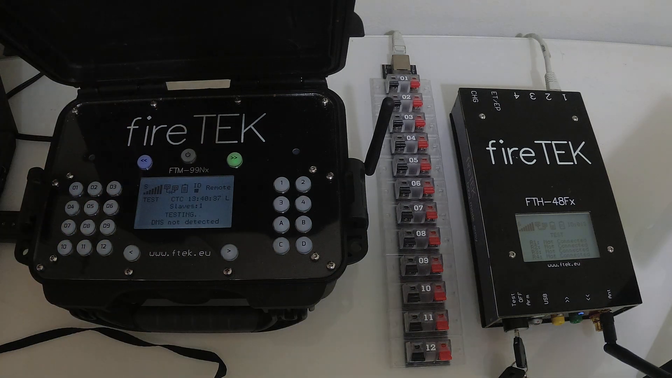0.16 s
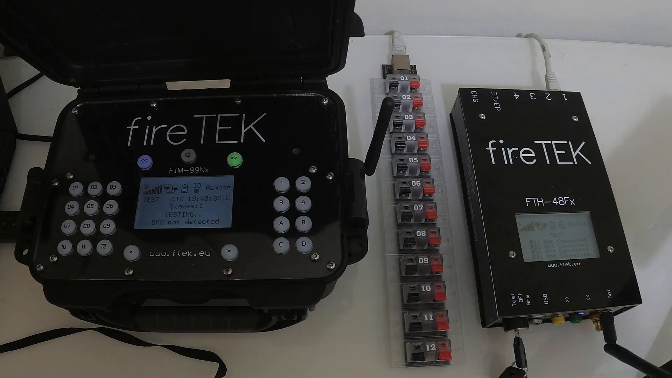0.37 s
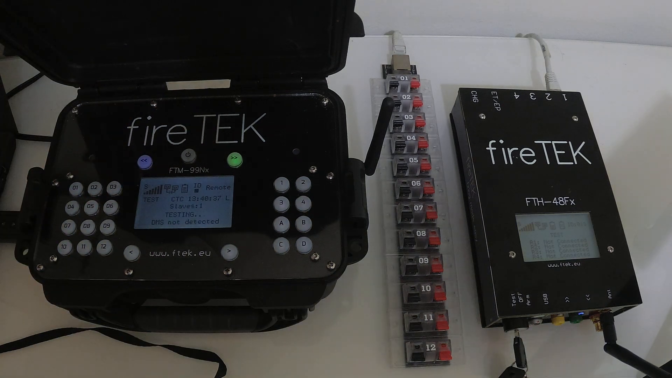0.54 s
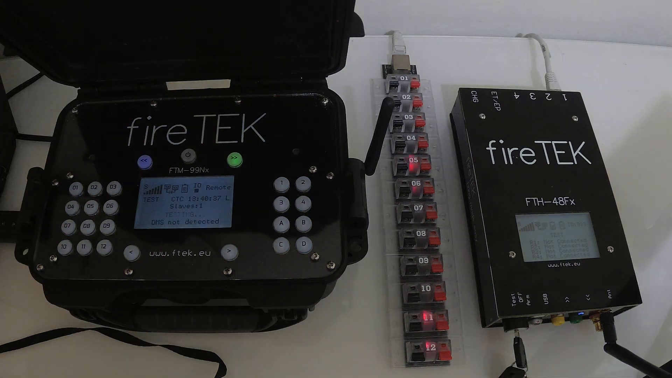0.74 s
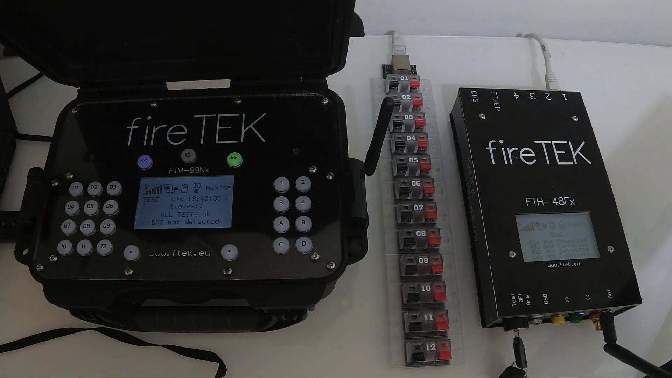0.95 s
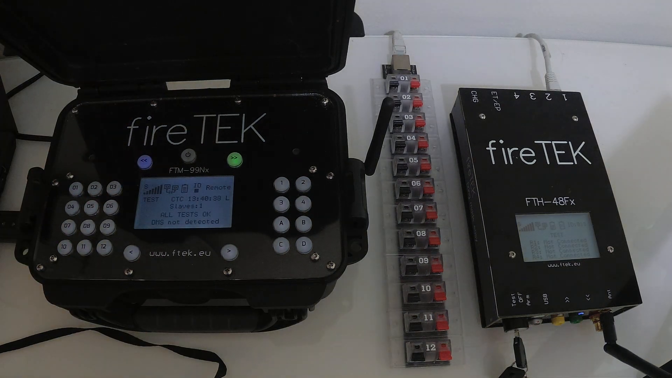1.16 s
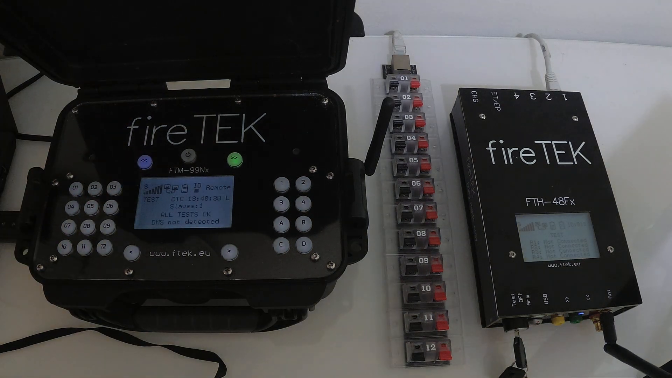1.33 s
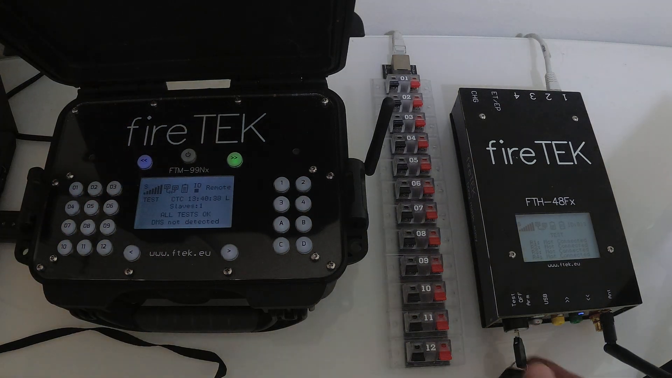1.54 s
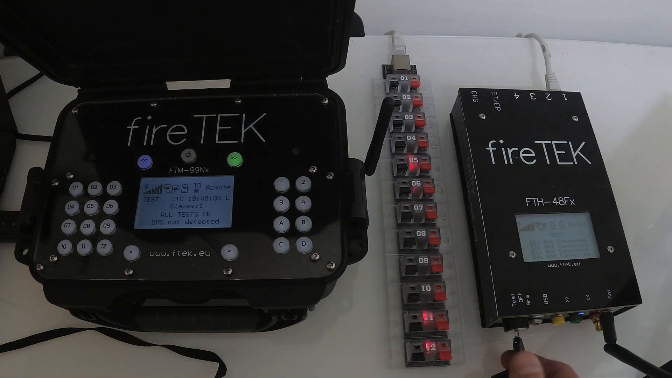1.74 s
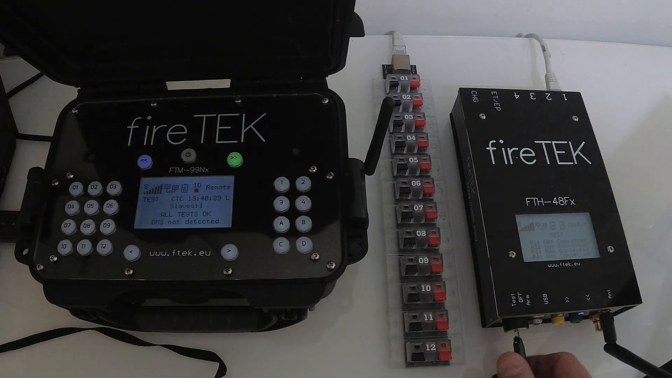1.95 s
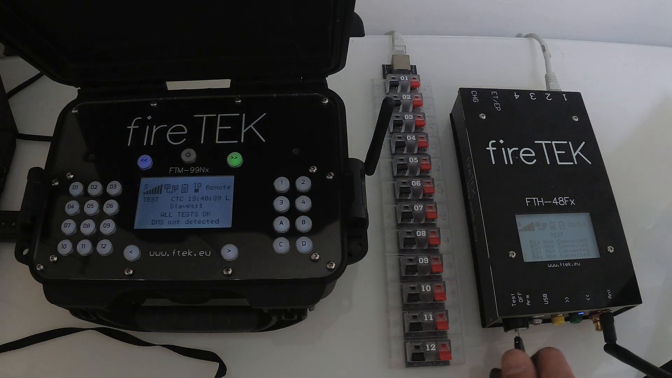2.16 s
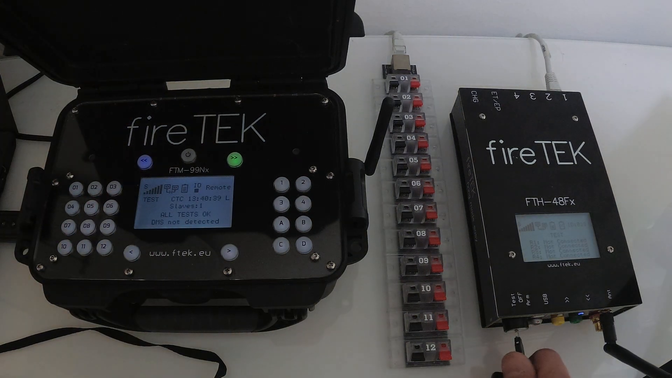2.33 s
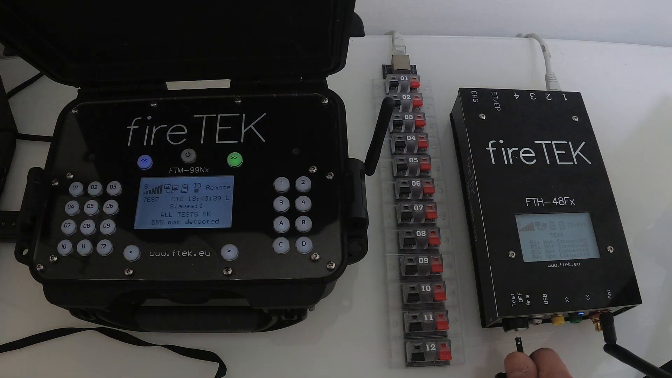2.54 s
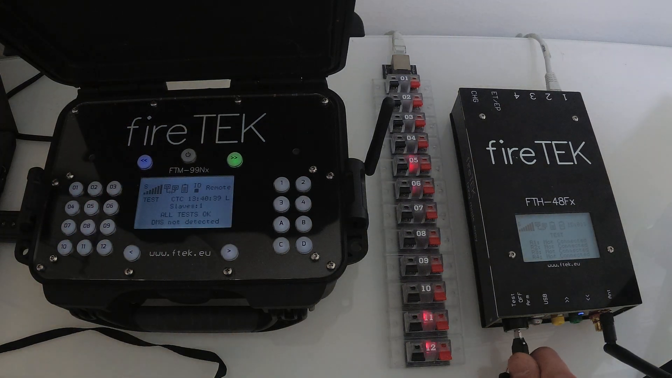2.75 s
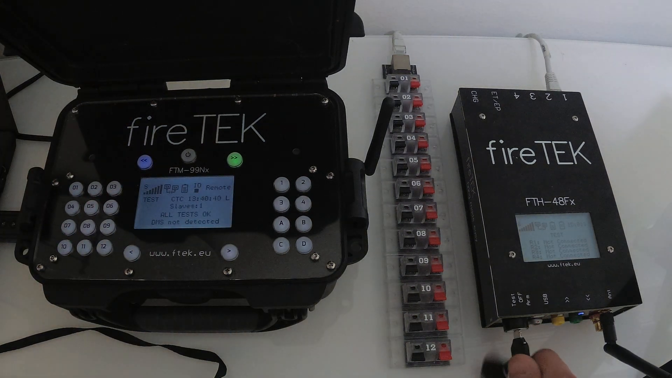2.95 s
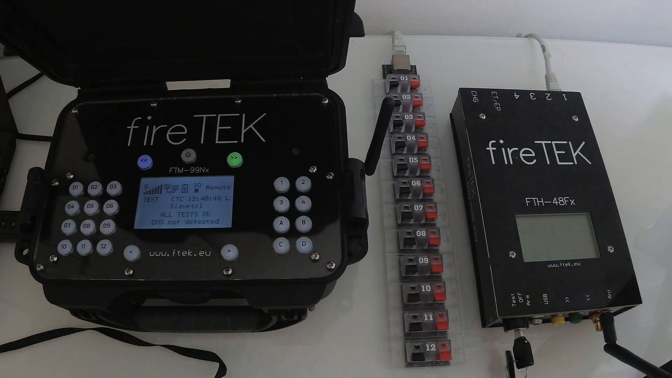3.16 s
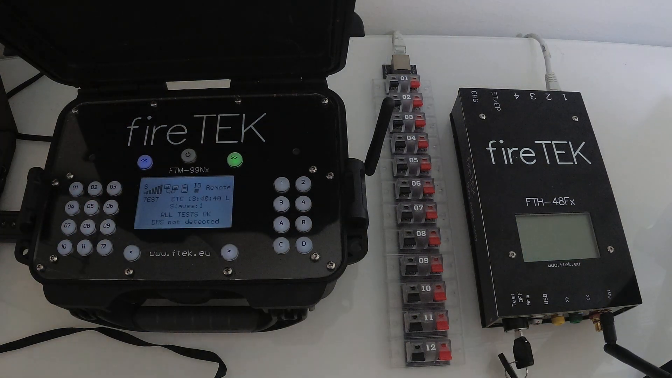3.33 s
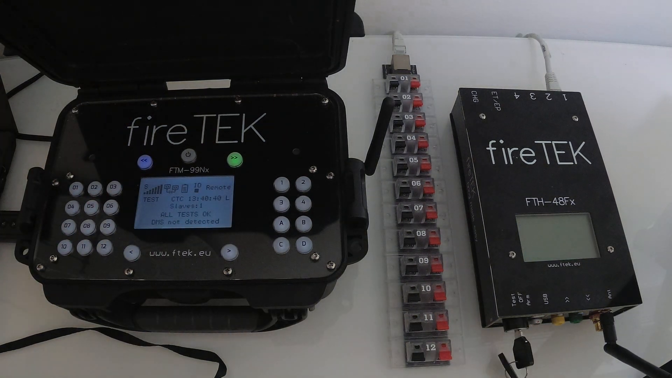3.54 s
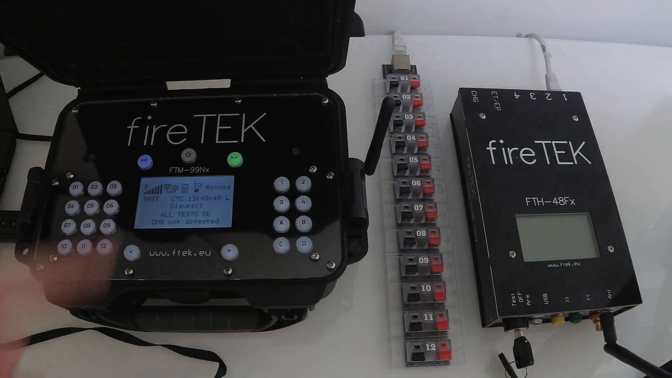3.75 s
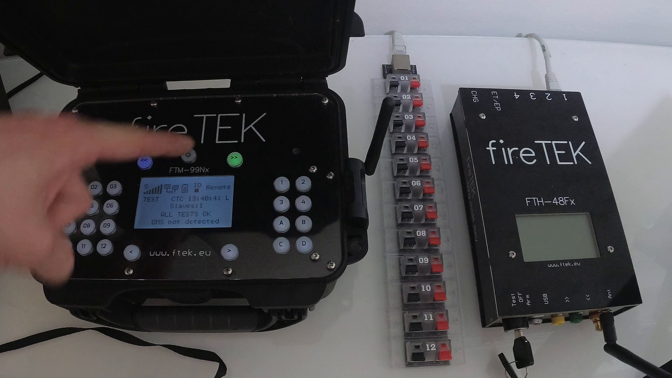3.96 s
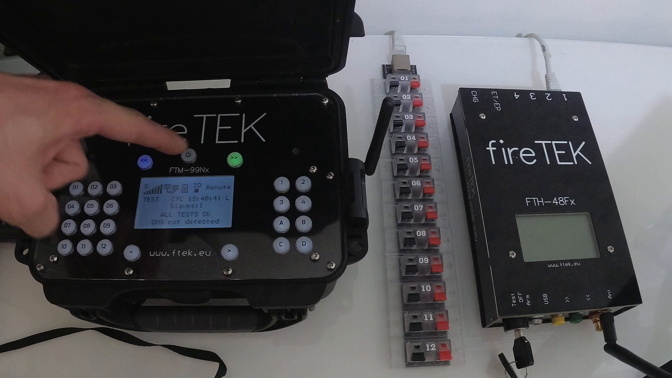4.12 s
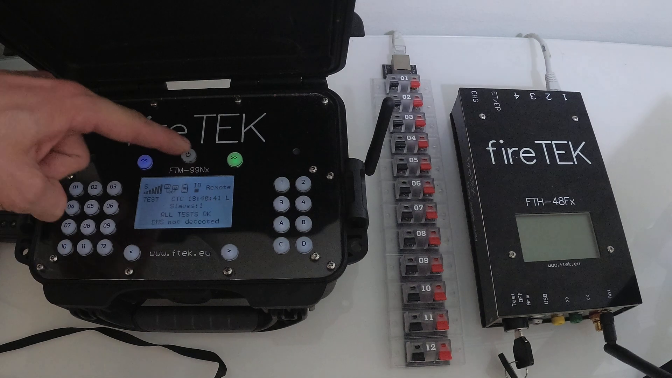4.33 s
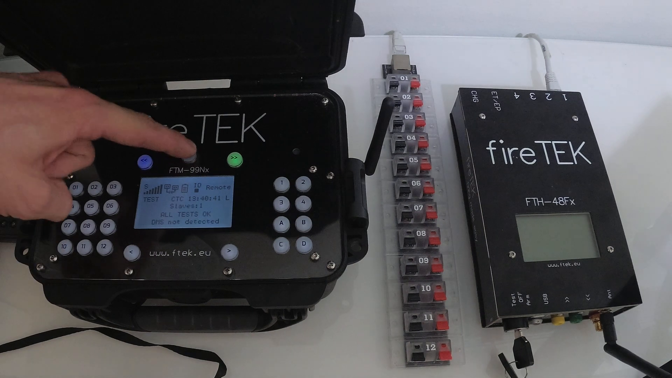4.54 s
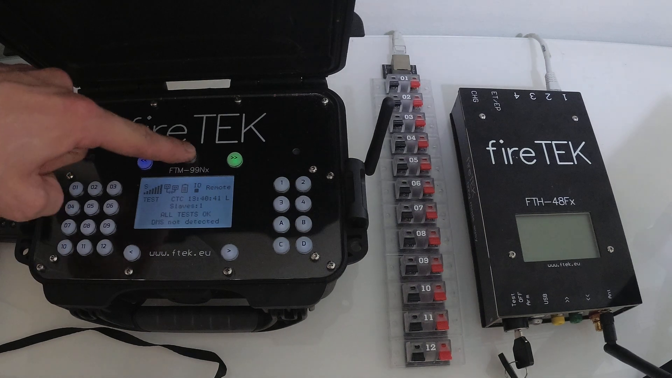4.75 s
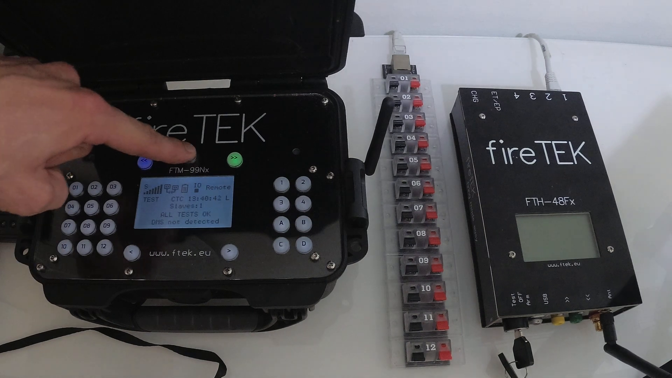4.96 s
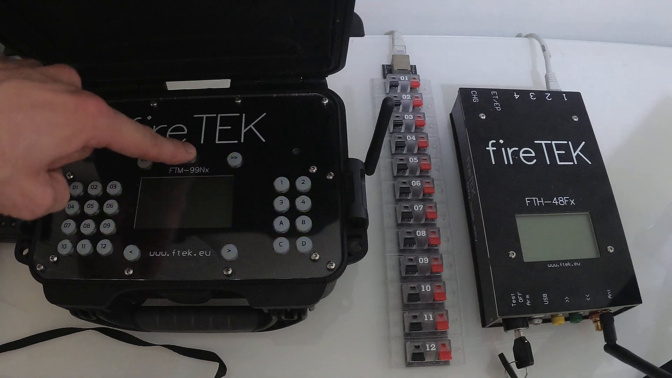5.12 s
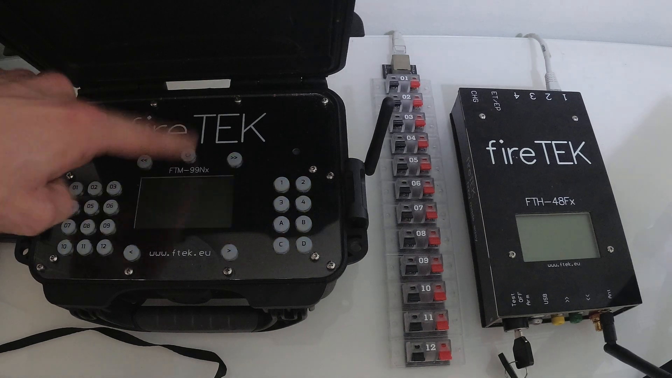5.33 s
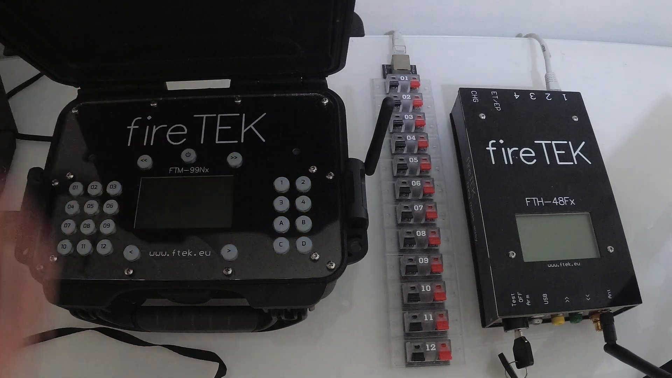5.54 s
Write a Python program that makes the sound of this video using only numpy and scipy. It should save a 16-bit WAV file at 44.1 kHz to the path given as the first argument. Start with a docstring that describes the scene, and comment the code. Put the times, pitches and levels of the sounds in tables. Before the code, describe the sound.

A quiet, small bare room heard close in stereo, with soft low-mid room noise, fine hiss, a weak low motor hum and a barely audible very high whine. From 0.4 to 1.2 s faint dry creaks sit near the left ear amid dull cloth rustle. At about 1.6 s a key is touched in a metal box, slightly right: a small crisp click with soft table thuds. Very faint fumbling ticks follow from 2.0 to 2.4 s. At 2.63 s comes a hard clack, then at 2.88 s the loudest, a brilliant metallic snap, with a smaller one at 2.95 s and light ticks to 3.4 s; rustle swells around 3 s. Tiny creaks and a dull knock occur at left between 3.3 and 3.9 s, then near stillness. At 5.16 s a plastic button snaps with a hollow, short boom, trailed by small knocks until 5.45 s. The room adds brief tails.

```python
"""Key turned in a switch, button let go

A small key is handled and turned in the switch of a metal-faced box on the right, then a button on a plastic
case to the left is let go: brief pushes ring banks of modes, with hard cracks on top and table thuds below.
Random slips creak near the left ear, shaped noise makes cloth and hiss, sines make the motor and steady tones.
A small, bare room answers the key, table and button with a decaying noise tail.
"""
import sys
import numpy as np
from scipy import signal
from scipy.fft import rfft, irfft
from scipy.io import wavfile

SR = 44100
rng = np.random.default_rng(int(sys.argv[2]) if len(sys.argv) > 2 else 0)


def put_to_file(sound):
    """Save the sound as 16-bit audio at rate SR, in the file named by the first command-line argument."""
    columns = np.atleast_2d(sound).T  # one column per channel
    safe = np.clip(columns, -1, 1)
    whole_steps = np.round(safe * 32767)
    wavfile.write(sys.argv[1], SR, whole_steps.astype(np.int16))


N = 250825


def amp(db):
    """Turn decibels into gain."""
    return 10 ** (np.asarray(db) / 20)


def pan(db):
    """Gains for the two ears that put left above right by this many dB."""
    return amp([[db / 2], [-db / 2]])


def rms_one(x):
    """Scale to rms 1."""
    return x / np.sqrt(np.mean(x ** 2) + 1e-20)


def in_time(rows):
    """Draw a (time, value) curve with one value a sample."""
    return np.interp(np.arange(N) / SR, *np.transpose(rows))


def at_hz(points, hz):
    """Read a (frequency, value) curve on a log-frequency axis."""
    point_hz, value = np.array(points).T
    return np.interp(np.log(np.maximum(hz, 1)), np.log(point_hz), value)


def drift(rate_hz):
    """Slow random wander of spread 1: noise at a fortieth of the sample rate through two equal poles."""
    r = np.exp(-80 * np.pi * rate_hz / SR)
    noise = rng.standard_normal(N // 40 + 2002)
    slow = signal.lfilter([1], [1, -2 * r, r * r], noise)[2000:]   # skip the filter's start
    return np.interp(np.arange(N) / 40, np.arange(len(slow)), rms_one(slow))


def stereo_noise(spectrum):
    """Coloured noise of rms 1, partly alike in both ears in the bass and nearly unrelated in the treble."""
    # how alike the ears are: (frequency [Hz], left-right correlation [-1 to 1])
    likeness = [(60, 0.63), (180, 0.45), (550, 0.61), (1650, 0.16), (4970, -0.1), (15000, 0.02)]
    hz = np.arange(N // 2 + 1) * SR / N
    alike = np.clip(at_hz(likeness, hz), -1, 1)
    mid, side = rfft(rng.standard_normal((2, N)))
    ears = np.sqrt(1 + alike) * mid + np.sqrt(1 - alike) * side * [[1], [-1]]
    return rms_one(irfft(ears * amp(at_hz(spectrum, hz)), N))


def contact(ms, lag_s, apart):
    """A brief scraping push of noise; each ear hears a partly different side of the object."""
    t = np.arange(round(.3 * SR)) / SR
    width_s = max(ms, .3) / 1000
    envelope = t / (t + width_s / 8) * np.exp(-(t / width_s) ** 2)
    shared, left, right = rng.standard_normal((3, len(t))) * envelope
    ears = np.array([shared + apart * left, shared + apart * right])
    far = int(lag_s < 0)   # a positive lag delays the left ear, a negative one the right
    ears[far] = np.roll(ears[far], round(abs(lag_s) * SR))
    return ears + 1e-18


def soft(push, top_hz):
    """A yielding surface passes on only the slow part of a push."""
    return signal.sosfilt(signal.butter(2, top_hz, fs=SR, output="sos"), push)


def ring(push, modes, favoured_hz=None, narrow_db=2.5, scatter_db=1.5):
    """A push rings every mode at its own height, most near the pitch that the point of contact favours."""
    out = 0
    head = push[:, :1024]
    floor = .25 * np.sqrt(np.sum(head ** 2))   # a pitch missing from the push stays faint
    for k, (hz, level_db, t60) in enumerate(modes):
        r = amp(-60 / (t60 * SR))
        w = 2 * np.pi * hz / SR
        # what the push holds at this pitch
        share = np.abs(head @ np.exp(-1j * w * np.arange(1024)))[:, None] + floor
        off_db = -narrow_db * np.log2(hz / favoured_hz) ** 2 if favoured_hz else 0
        height = amp(level_db + off_db + scatter_db * rng.standard_normal())
        gain = height / share * (-1) ** k   # neighbours swing opposite ways
        out = out + gain * signal.lfilter([.5, 0, -.5], [1, -2 * r * np.cos(w), r * r], push)
    return out


def crack(push):
    """The bare snap of hard surfaces meeting: the push with its spectrum evened out, then coloured."""
    # colour of the snap: (frequency [Hz], density [dB per Hz])
    snap_colour = [(500, -25), (1200, 0.5), (3000, 9), (6000, 5.5), (10000, 9.5), (12000, 0), (15000, -6)]
    length = push.shape[1]
    colour = amp(at_hz(snap_colour, np.arange(length // 2 + 1) * SR / length))
    spectrum = rfft(push)
    even = spectrum / (np.abs(spectrum) + 1e-9) ** .6
    snap = irfft(even * colour, length) * (np.abs(push) > 1e-9)   # silent once the push is over
    strength = np.sqrt(np.sum(snap ** 4, axis=1) / np.sum(snap ** 2, axis=1))   # weighted to the loud part
    return snap / strength[:, None] / 2


def add(track, s, sound):
    """Mix a sound into the track at a time in seconds."""
    i = round(s * SR)
    track[:, i:i + sound.shape[1]] += sound[:, :N - i]


def room_tone():
    """Room tone and recorder hiss: steady noise, strongest in the low mids."""
    # colour of the noise: (frequency [Hz], density [dB per Hz])
    tone_colour = [(20, -26), (45, -19), (90, -13), (130, -3), (220, 3), (400, -4.5), (650, -8.5),
                   (1000, -10.5), (2000, -15), (4000, -15), (9000, -15.5), (15000, -16)]
    return amp(-59.5) * stereo_noise(tone_colour)


def room(x):
    """Each ear gets a dense tail of reflections that dies band by band."""
    # decay of the room: (frequency [Hz], time to fall 60 dB [s])
    decay = [(200, 0.28), (530, 0.34), (1400, 0.39), (3700, 0.31), (9700, 0.3), (15000, 0.18)]
    level_db, gap_s = -7, 0.0013
    t = np.arange(round(.7 * SR)) / SR
    edges = 100 * 2 ** np.arange(0, 7.6, .5)   # half-octave bands [Hz]
    tail = 0
    for low, high in zip(edges, edges[1:]):
        band_pass = signal.butter(2, [low, high], "band", fs=SR, output="sos")
        band = signal.sosfilt(band_pass, rng.standard_normal((2, len(t))))
        tail = tail + band * amp(-60 * t / at_hz(decay, np.sqrt(low * high)))
    tail[1] = .5 * tail[0] + np.sqrt(.75) * tail[1]   # the two ears sit close together
    tail = tail * np.clip(t / gap_s - 1, 0, 1)   # the first wall is a little way off
    tail = tail / np.sqrt(np.sum(tail ** 2) / 2)
    return amp(level_db) * signal.fftconvolve(x, tail, axes=1)[:, :N]


def steady_tones():
    """Two sines that stand still, one low and one very high."""
    # steady tones: (frequency [Hz], level [dB rms])
    tones = [(70, -85.5), (15703.5, -75.5)]
    t = np.arange(N) / SR
    return np.sqrt(2) * sum(amp(db) * np.sin(2 * np.pi * hz * t) for hz, db in tones)


def motor():
    """Motor orders are sines that share one slightly wandering speed; the upper ones waver a little in level."""
    # upper orders: (multiple of the motor speed, level before wavering [dB rms])
    orders = [(2, -78), (3, -68.5), (7, -69), (12, -78.5), (13, -72.5)]
    # first order, which fades and returns: (time [s], level [dB rms])
    shaft = [(0, -81), (2.3, -82), (3.3, -85), (5.3, -91), (5.69, -81)]
    motor_hz = 49.25   # mean speed
    turn = 2 * np.pi * np.cumsum(motor_hz * (1 + 0.001212 * drift(0.79))) / SR
    out = amp(in_time(shaft)) * np.sin(turn)
    for order, db in orders:
        out += amp(db + 1.22 * drift(2.5)) * np.sin(order * turn + rng.uniform(0, 2 * np.pi))
    return np.sqrt(2) * out


def cloth():
    """Cloth rustles: dull noise whose level swells and sinks, with a quick flutter on top."""
    # strength of the rustle: (time [s], level before the flutter [dB])
    rustle = [(0.0, -67), (0.57, -62), (1.06, -62), (1.3, -68), (1.85, -65.5), (2.6, -68), (2.98, -55.5),
              (3.33, -64.5), (3.96, -71), (4.89, -76), (5.31, -65.5), (5.69, -69.5)]
    # colour of the cloth: (frequency [Hz], density [dB per Hz])
    cloth_colour = [(150, -45), (300, 7.5), (600, 0), (1300, -0.5), (2500, -9.5), (5000, -8), (9000, -16)]
    return amp(in_time(rustle) + 0.97 * drift(21)) * stereo_noise(cloth_colour)


def creak():
    """Dense uneven slips excite a few hollow resonances, mostly in the left ear; each creak swells, holds, fades."""
    # hollow resonances: (frequency [Hz], width [Hz], level [dB])
    body = [(417, 48, -2), (747, 130, 17.5), (987, 20, 14), (1094, 23, 18.5)]
    # creaks: (start of the hold [s], held for [s], level before the ears are set [dB])
    creaks = [(.42, 0.11, -61), (.57, 0.0066, -55), (.62, .6, -67), (1.52, 0.039, -63),
              (1.849, 0.0042, -59), (3.33, 0.033, -60), (3.615, .003, -64.5), (3.75, 0.076, -61.5),
              (3.862, 0.051, -61.5), (4.62, 0.019, -66)]
    rise_db_per_s, fall_db_per_s = 600, 400
    t = np.arange(N) / SR
    struck = rng.random(N) < 900 / SR   # about 900 slips a second
    slips = struck * amp(1.16 * rng.exponential(1, N)) * rng.choice([-1, 1], N)
    out = 0
    for hz, width_hz, level_db in body:
        r = np.exp(-np.pi * width_hz / SR)
        a = [1, -2 * r * np.cos(2 * np.pi * hz / SR), r * r]
        out = out + amp(level_db) * signal.lfilter([1 - r * r, 0, r * r - 1], a, slips)
    load = 0
    for s, held, db in creaks:
        before, after = np.maximum(s - t, 0), np.maximum(t - s - held, 0)
        load = load + amp(db - rise_db_per_s * before - fall_db_per_s * after)
    return load * rms_one(out) * amp([[3], [-9]])


def table():
    """The hand's weight shakes the table top: soft pushes ring a few low modes."""
    # thuds: (time [s], level [dB], favoured pitch [Hz], contact [ms])
    thuds = [(1.597, -44.5, 200, 14.6), (1.614, -48.5, 200, 3.6), (1.987, -48, 197, 4),
             (2.008, -51.5, 238, 2.8), (2.634, -46.5, 312, 2.1), (2.654, -48.5, 317, 4.7),
             (2.885, -42, 202, 4.8), (3.375, -58, 220, 10)]
    # modes of the table top: (frequency [Hz], level [dB], time to fall 60 dB [s])
    table_modes = [(196, 0, 0.15), (315, 0.5, 0.26), (455, 8.5, 0.2)]
    out = np.zeros((2, N))
    for s, thud_db, thud_hz, ms in thuds:
        push = soft(contact(ms, lag_s=0.00016, apart=0.36), 380)
        add(out, s, amp(thud_db) * ring(push, table_modes, thud_hz, narrow_db=39.0))
    return out


def button():
    """The button snaps against the panel; the hollow shell booms under it."""
    # button and finger on the case, and at 3.61 s a dull knock far left, probably a creak:
    # (time [s], panel level [dB], shell level [dB], favoured shell pitch [Hz], contact [ms], left over right [dB])
    touches = [(3.610, -62.5, -52.5, 400, 8.7, 20), (3.960, -59.5, -75, 350, 1.7, 3),
               (4.099, -65, -57, 540, 3.6, 1.5), (5.160, -34, -56, 350, 5.1, 3),
               (5.165, -32, -29.5, 345, 2.3, 1.5), (5.177, -36.5, -46, 500, 5.2, -6),
               (5.210, -52, -50, 330, 8.7, -2), (5.225, -47, -58, 400, 4.3, -5),
               (5.249, -65, -42.5, 300, 1.95, 0), (5.261, -68, -49, 298, 2.7, -2),
               (5.269, -45, -47, 500, 3.2, -1), (5.272, -57, -41.5, 140, 4.0, 0),
               (5.296, -62, -53, 350, 4.9, 1.5), (5.447, -50, -54.5, 307, 1.6, 4)]
    # modes of the panel: (frequency [Hz], level [dB], time to fall 60 dB [s])
    panel_modes = [(917, 0, 0.043), (1038, -2, 0.048), (1360, -5, 0.017), (1570, -10, 0.014),
                   (2230, -7.5, 0.016), (2440, -16.5, 0.039), (3050, -6.5, 0.0074)]
    # modes of the shell: (frequency [Hz], level [dB], time to fall 60 dB [s])
    shell_modes = [(120, -5.5, 0.046), (237, -6.5, 0.069), (353.4, 1, 0.063), (426, -4, 0.047),
                   (545, -2.5, 0.047), (696, -7, 0.044)]
    out = np.zeros((2, N))
    for s, panel_db, shell_db, shell_hz, ms, pan_db in touches:
        push = contact(ms, lag_s=-.00004, apart=0.052)
        snap = amp(15.5 - 5.5 * ms) * crack(push)   # the briefer the contact, the sharper
        sound = amp(panel_db) * (ring(soft(push, 1700), panel_modes) + snap)
        sound += amp(shell_db) * ring(soft(push, 720), shell_modes, shell_hz, narrow_db=5.0)
        add(out, s, sound * pan(pan_db))
    return out


def key():
    """Every contact rings and cracks the metal of key and lock and knocks the box around them."""
    # key and lock contacts: (time [s], metal level [dB], favoured ring pitch [Hz], box level [dB],
    # favoured knock pitch [Hz], contact [ms], left over right of the metal [dB])
    contacts = [(1.572, -53, 5200, -55.5, 2700, 7.1, -4), (1.614, -49, 4000, -34.5, 2600, 1.5, -14),
                (1.62, -34, 9900, -38.5, 2440, 4.4, -9), (1.627, -41.5, 8000, -36.5, 640, 5.7, 12),
                (1.987, -55, 6000, -56, 700, 4, -7), (2.008, -50.5, 9000, -51.5, 600, 5.5, -2),
                (2.029, -60, 9000, -59.5, 1500, 4.8, -7), (2.08, -62, 5000, -54.5, 1300, 3.4, -2),
                (2.199, -70, 5000, -56, 1300, 5.0, -2), (2.295, -70, 5000, -58.5, 1300, 3, 0),
                (2.4, -70, 5000, -56, 1280, 6.5, -1), (2.634, -26.5, 8000, -24, 1170, 2.92, -8),
                (2.653, -39, 6000, -48, 1300, 2.2, 7), (2.848, -38.5, 10100, -55, 1400, 3.6, -9.5),
                (2.876, -14, 7000, -29, 614, 2.56, -4), (2.885, -32, 5000, -38, 700, 4.2, -1),
                (2.953, -26, 6000, -39, 750, 4.45, -2), (3.04, -44.5, 14000, -62, 1500, 3.0, -3),
                (3.171, -60, 5010, -50.5, 1490, 7, -2), (3.374, -57, 5000, -51, 1200, 4, 0.1)]
    # modes of key and lock barrel: (frequency [Hz], level [dB], time to fall 60 dB [s])
    lock_modes = [(3950, -4, 0.0078), (5030, -22, 0.063), (4847, 0, 0.0078), (5510, -0.5, 0.012),
                  (6750, -14.5, 0.017), (7996, 5.5, 0.0041), (9130, 4, 0.0039), (8920, -14.5, 0.051),
                  (9160, -3, 0.0071), (10295, -1.5, 0.018), (12200, -29, 0.0077), (13780, -2, .007),
                  (15090, 9.5, 0.0044), (15600, 4, 0.0048)]
    # modes of the box round the lock: (frequency [Hz], level [dB], time to fall 60 dB [s])
    box_modes = [(607, -2.5, 0.029), (838, -6.5, 0.045), (1088, -1, 0.023), (1294, -2, 0.028),
                 (1448, -3, 0.024), (1747, 1, 0.012), (2410, 5, 0.01), (2740, 2.5, 0.033),
                 (3335, 10.5, 0.0045)]
    lag_s = 0.00016   # the left ear hears it later
    out = np.zeros((2, N))
    for s, metal_db, ring_hz, box_db, knock_hz, ms, pan_db in contacts:
        push = contact(ms, lag_s, apart=0.87)
        low_push = contact(ms, lag_s, apart=0.32)   # long waves reach both ears more alike
        snap = amp(10 - 1.5 * ms) * crack(push)   # the briefer the contact, the sharper
        metal = ring(push, lock_modes, ring_hz, narrow_db=3.0) + snap
        knock = ring(soft(low_push, 2130), box_modes, knock_hz, narrow_db=5.0)
        add(out, s, amp(metal_db) * metal * pan(pan_db))
        add(out, s, amp(box_db) * knock)
    return out


def scene():
    """Sum the steady background, the creaks, the hands on the table and the room's answer to the hands."""
    steady = room_tone() + cloth()
    hiss_top = signal.cheby2(24, 60, 15860, fs=SR, output="sos")   # 60 dB down from 15860 Hz up
    steady = signal.sosfilt(hiss_top, steady)
    hands = table() + button() + key()
    # the microphone's low cut thins the bass of the handling
    low_cut = signal.butter(4, 121, "high", fs=SR, output="sos")
    hands = signal.sosfilt(low_cut, hands)
    return steady + steady_tones() + motor() + creak() + hands + room(hands)


def record(dry):
    """Cut the top steeply: 70 dB down from 17 kHz up."""
    return signal.sosfilt(signal.cheby2(14, 70, 17000, fs=SR, output="sos"), dry)


dry = scene()
out = record(dry)
put_to_file(out)
```